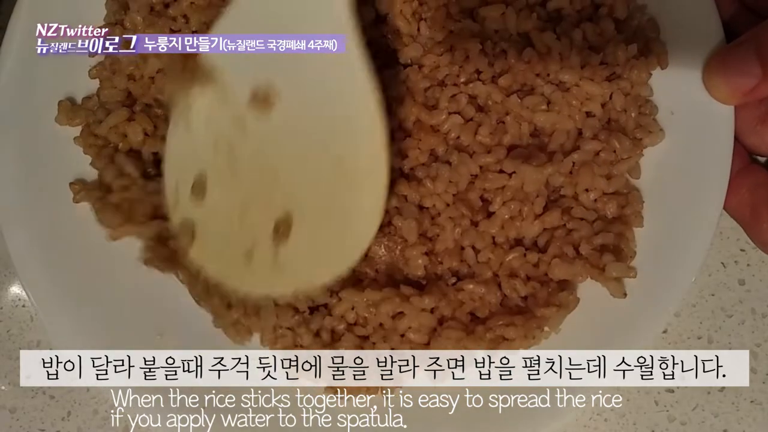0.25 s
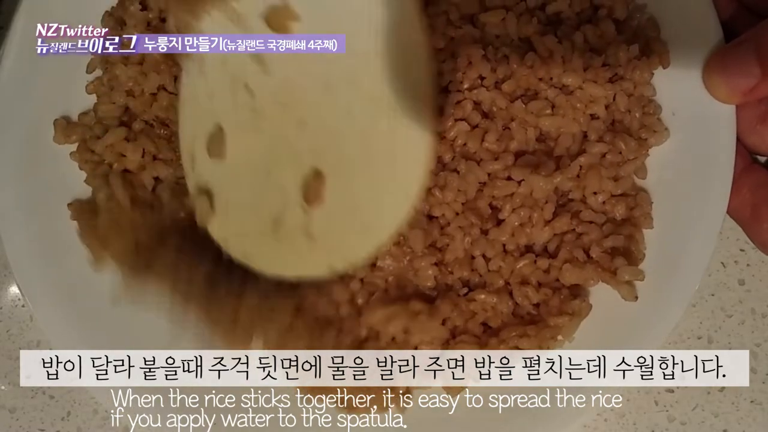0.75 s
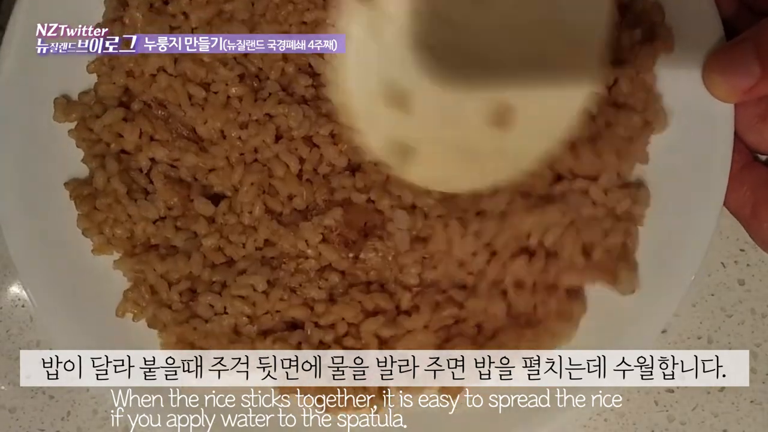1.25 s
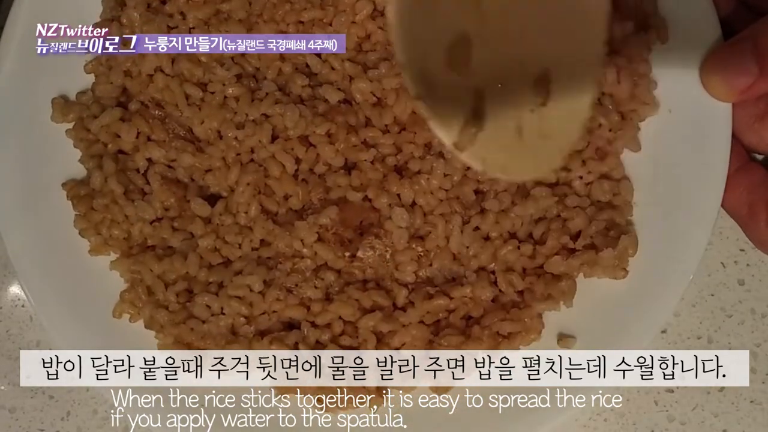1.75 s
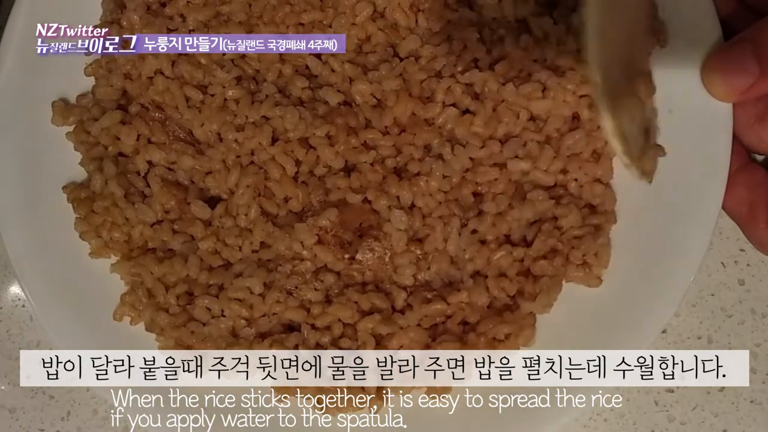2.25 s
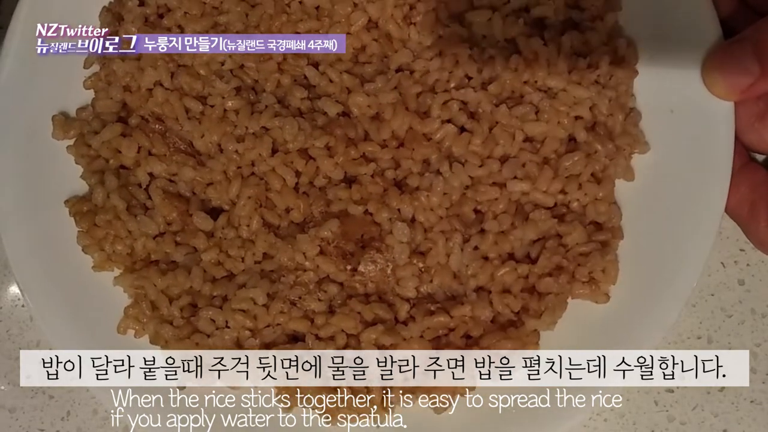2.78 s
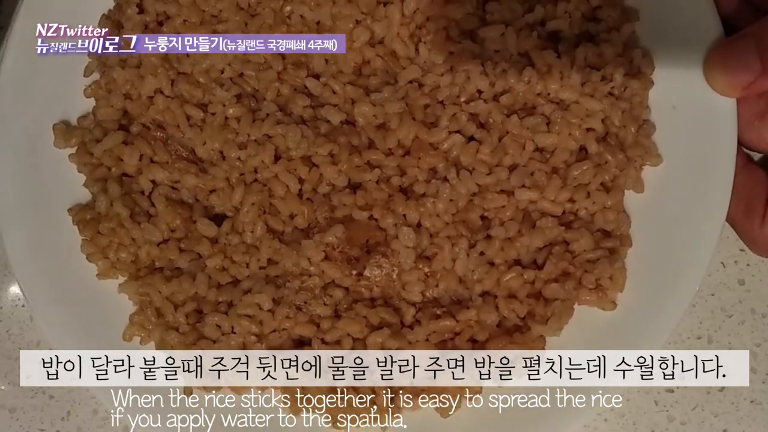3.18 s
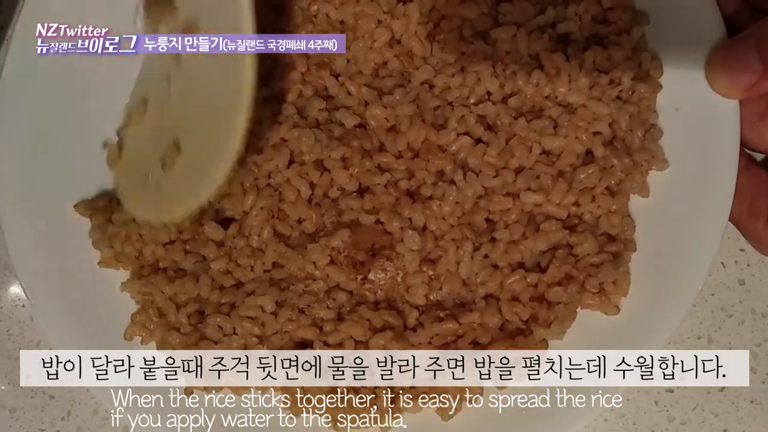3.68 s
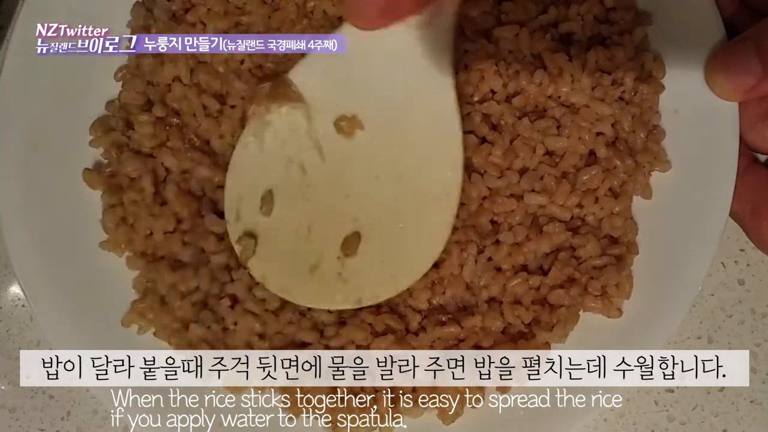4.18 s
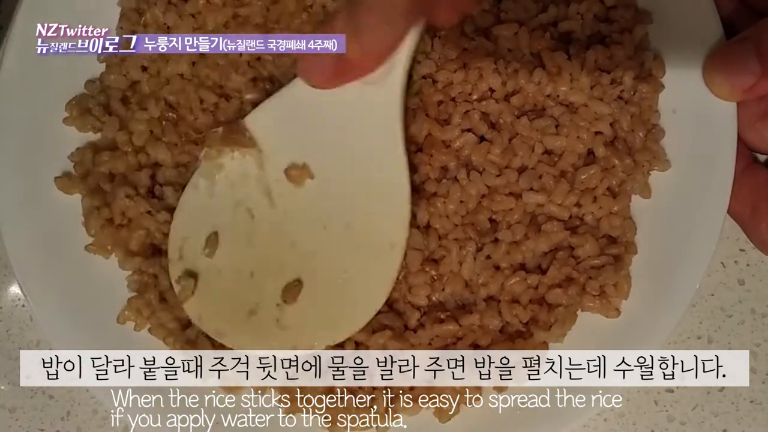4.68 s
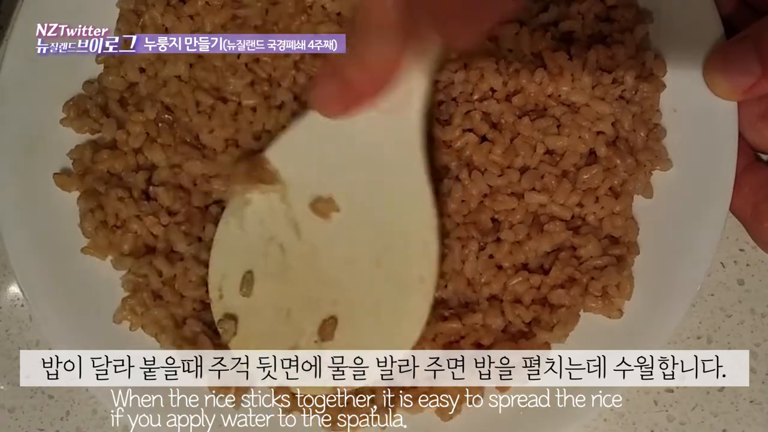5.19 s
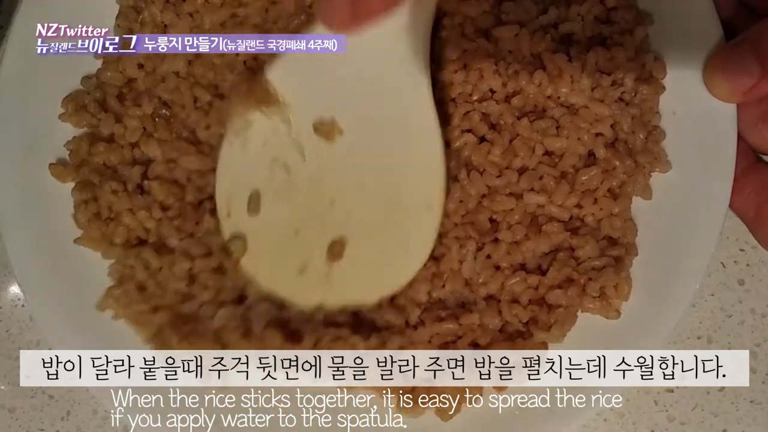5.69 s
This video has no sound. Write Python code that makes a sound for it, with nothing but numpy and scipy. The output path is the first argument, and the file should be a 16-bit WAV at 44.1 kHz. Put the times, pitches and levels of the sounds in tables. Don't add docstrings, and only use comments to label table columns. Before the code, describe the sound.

A quiet, small kitchen with hard surfaces, heard closely through a phone in stereo. From 0 to 1.8 s a plastic paddle pats and smears sticky rice on a plate: faint dry taps, dull short clunks, little tearing grain ticks and brief squelchy rubs. From about 1.87 to 2.6 s come six hard, bright knocks on the plate rim, roughly seven a second, the fourth weaker; each has a sharp clack, short ceramic ring and small-room reflection. After a half-second pause, five more knocks run from 3.08 to 3.64 s, slightly softer. A near-quiet gap follows. From about 4 s sticky smears and grain snaps return, with firmer cushioned taps around 4.46, 4.74 and 5.2 s and a busy cluster from 5.6 to 5.9 s. Low soft plate thumps accompany contacts. Steady faint hiss and a broken, low fridge hum lie beneath, with slightly smeared treble.

```python
import sys
import numpy as np
from scipy import signal
from scipy.fft import rfft, irfft
from scipy.io import wavfile
from scipy.ndimage import uniform_filter1d, map_coordinates

SR = 44100
rng = np.random.default_rng(int(sys.argv[2]) if len(sys.argv) > 2 else 0)


def volts_from_decibels(level):
    exponent = np.asarray(level, float) / 20
    return 10 ** exponent


def store_wav(level_fs):
    pcm = np.round(np.clip(np.atleast_2d(level_fs), -1, 1) * 32767)
    wavfile.write(sys.argv[1], SR, pcm.T.astype(np.int16))


N = 261954


def unit(x):
    return x / np.sqrt(np.mean(x ** 2) + 1e-20)


def wobble(rate):
    knots = rng.standard_normal(int(N * rate / SR) + 4)
    return map_coordinates(knots, [np.arange(N) * rate / SR])


def along(points, hz):
    f, v = np.transpose(points)
    return np.interp(np.log(hz + 1), np.log(f), v)


def coloured(x, spectrum):
    n = x.shape[-1]
    hz, db = np.transpose(spectrum)
    pitch = np.log(np.fft.rfftfreq(n, 1 / SR) + 1)
    gain = volts_from_decibels(np.interp(pitch, np.log(hz), db, -120, -120))
    return unit(irfft(rfft(x) * gain, n))


# (frequency [Hz], correlation [1])
NEAR = [(150, 0.63), (500, 0.45), (1200, 0.63), (2500, 0.025), (8000, 0.26)]


def pair(n, patchy_db, size, floor=-9):
    hz, _, (a, b) = signal.stft(rng.standard_normal((2, n)), SR, nperseg=512)
    turn = np.arccos(np.clip(along(NEAR, hz), -1, 1))[:, None] / 2
    field = rng.standard_normal(a.shape)
    field = uniform_filter1d(field, size[0], axis=0)
    field = unit(uniform_filter1d(field, size[1], axis=1))
    muting_db = 22 / (1 + np.exp(6 * (field - floor)))
    gain = volts_from_decibels(patchy_db * field - muting_db)
    left = np.cos(turn) * a + np.sin(turn) * b
    right = np.cos(turn) * a - np.sin(turn) * b
    return signal.istft(gain * np.array([left, right]), nperseg=512)[1][:, :n]


def gate(s, length):
    t = np.arange(N) / SR
    edge_s = .012
    return np.clip(np.minimum(t - s, s + length - t) / edge_s + .5, 0, 1)


# (start [s], length [s], level [dB])
HUM_OPEN = [(0, 0.28, -68), (.35, 0.4, -62.5), (.77, 0.1, -64.5), (1.312, 0.13, -64.5), (1.71, 0.048, -59),
            (1.886, 0.16, -61.5), (2.132, .5, -59.5), (2.69, 0.43, -68), (3.2, 0.094, -65.5),
            (3.34, 0.079, -64.5), (3.632, 0.09, -60), (3.7, 0.21, -68.5), (4.115, 0.058, -64.5),
            (4.294, 0.036, -55.5), (4.356, 0.043, -71), (4.467, 0.12, -68), (4.634, 0.12, -73),
            (5.125, 0.04, -72), (5.627, 0.08, -63), (5.75, 0.13, -58)]
# (start [s], length [s], level [dB])
OCTAVE_OPEN = [(0, 0.1, -62), (0.21, 0.11, -67), (.34, .53, -66), (0.978, .11, -67.5), (1.14, 0.035, -74),
               (1.23, 0.032, -70), (1.417, .11, -66), (1.569, .04, -69), (1.88, 0.18, -61),
               (2.13, 0.51, -59.5), (2.71, .1, -69.5), (2.908, .12, -62), (3.188, 0.34, -69),
               (3.64, 0.115, -59.5), (3.838, 0.13, -68.5), (4.46, 0.14, -71), (4.63, .1, -68.5),
               (4.89, 0.067, -68), (5.327, 0.091, -73.5), (5.75, 0.16, -64)]
# (frequency [Hz], level [dB])
FAN = [(980, -77.5), (1165, -87)]
# (frequency [Hz], level [dB per Hz])
RUMBLE = [(30, -32.5), (60, -24), (100, -0.5), (150, -3.5), (200, -5.5), (300, -6.5), (340, -42)]


def fridge():
    t = np.arange(N) / SR
    shut_hum_db = -88.5
    hum_gain = volts_from_decibels(shut_hum_db) + sum(volts_from_decibels(db) * gate(s, length) for s, length, db in HUM_OPEN)
    octave_gain = sum(volts_from_decibels(db) * gate(s, length) for s, length, db in OCTAVE_OPEN)
    phase = 2 * np.pi * 98 * t + .5 * wobble(6)
    hum = volts_from_decibels(-4.5) * hum_gain * np.sin(phase)
    octave = octave_gain * volts_from_decibels(-4 + 1.3 * wobble(26)) * np.sin(2.02 * phase + 0.9 * wobble(32))
    rumble_gain = volts_from_decibels(-9) * hum_gain + volts_from_decibels(-15.5) * octave_gain + volts_from_decibels(-92.5)
    rumble = rumble_gain * coloured(pair(N, patchy_db=6, size=(1, 5)), RUMBLE)
    lines = 0
    for hz, db in FAN:
        lines = lines + volts_from_decibels(db + 1.2 * wobble(5)) * np.sin(2 * np.pi * hz * t + 1.2 * wobble(16))
    return hum + octave + lines + rumble


# (frequency [Hz], level [dB per Hz])
AIR = [(450, -32), (760, -7), (852, -9.5), (1000, -2), (1040, -7.5), (1190, -7.5), (2810, -17),
       (5100, -18.5), (6170, -19.5), (9150, -20), (9880, -24.5), (15800, -15)]


def air():
    return volts_from_decibels(-67 + 0.63 * wobble(7.2)) * coloured(pair(N, patchy_db=3.5, size=(2, 9)), AIR[1:])


# (frequency [Hz], level [dB per Hz])
MURMUR = [(230, -28.5), (260, -9.5), (480, -1), (680, 3.5), (770, -3.5), (800, -39)]
# (start [s], length [s])
MUTES = [(0.295, .04), (0.42, 0.027), (0.73, 0.05), (1.1, 0.036), (1.52, 0.033), (1.64, 0.067),
         (1.785, 0.067), (2.797, .03), (2.86, .025), (2.94, 0.032), (3.15, .05), (3.929, 0.097),
         (4.332, 0.064), (4.59, 0.055), (4.678, 0.047), (4.822, 0.075), (4.99, .025), (5.086, 0.038),
         (5.272, 0.033), (5.427, 0.1), (5.803, 0.048)]


def murmur():
    t = np.arange(N) / SR
    murmur_db, mute_db = -75.5, -20
    puff_db, puff_t60_s = 1.3, 0.054
    hush = volts_from_decibels(murmur_db + mute_db * sum(gate(s, length) for s, length in MUTES))
    puffs = sum(volts_from_decibels(db + puff_db - 60 * np.abs(t - s) / puff_t60_s) * (t > s) for s, db, hz in CLUNKS)
    return (hush + puffs) * coloured(pair(N, patchy_db=2, size=(2, 7), floor=-0.21), MURMUR)


# (time [s], peak level [dB], frequency [Hz], t60 [s])
THUMPS = [(0.34, -59, 211, 0.032), (0.499, -57.5, 192, 0.096), (0.581, -62, 192, 0.1),
          (0.843, -68, 144, 0.095), (1.317, -59.5, 207, 0.05), (1.712, -57, 204, 0.093),
          (1.87, -38, 226, 0.022), (1.997, -47, 210, 0.058), (2.136, -53, 217, 0.049),
          (2.416, -48, 216, 0.041), (2.575, -49.5, 206, 0.061), (3.076, -53.5, 212, 0.029),
          (3.219, -51.5, 230, 0.041), (3.368, -49.5, 213, 0.037), (3.504, -58.5, 296, 0.034),
          (3.64, -47.5, 210, 0.031), (4.131, -55, 204, 0.059), (4.293, -43.5, 197, 0.036),
          (4.362, -60.5, 197, 0.043), (4.467, -63, 200, 0.066), (4.552, -65, 285, 0.067),
          (4.639, -64.5, 210, 0.079), (5.035, -71, 207, 0.063), (5.136, -52, 203, 0.03),
          (5.651, -48.5, 208, 0.053), (5.75, -42, 214, 0.034), (5.856, -47, 202, 0.05)]


def thumps():
    t = np.arange(SR // 5) / SR
    out = np.zeros(N + SR)
    for s, db, hz, t60 in THUMPS:
        push = np.sin(2 * np.pi * hz * t) * volts_from_decibels(-60 * t / max(t60, .02)) * (1 - np.exp(-t / 0.0024))
        out[round(s * SR):][:len(t)] += volts_from_decibels(db + 11.0) * push
    return out[:N] * volts_from_decibels([[-.7], [.7]])


# (time [s], peak level [dB], frequency [Hz])
CLUNKS = [(.072, -64.5, 666), (.355, -63.5, 592), (.44, -64, 716), (.56, -60, 660), (.794, -57, 626),
          (1.18, -62, 657), (1.38, -65, 480), (1.56, -67.5, 484), (1.625, -71, 620), (1.77, -67.5, 486),
          (4.05, -66.5, 643), (4.25, -63, 492), (4.465, -51.5, 608), (4.552, -52.5, 618),
          (4.67, -71.5, 665), (4.744, -48.5, 611), (4.89, -69, 495), (5.208, -57, 627), (5.34, -66.5, 672),
          (5.588, -52, 617), (5.654, -47, 497), (5.751, -50, 640), (5.856, -49, 520), (5.915, -66, 700)]


def clunks():
    t = np.arange(SR // 5) / SR
    t60_s, rise_s = 0.079, 0.0026
    out = np.zeros((2, N + SR))
    for s, db, hz in CLUNKS:
        drift = .006 * np.cumsum(rng.standard_normal(len(t))) + rng.normal(0, 0.22, (2, 1))
        envelope = volts_from_decibels(db + 7 - 60 * t / t60_s) * (1 - np.exp(-t / rise_s))
        out[:, round(s * SR):][:, :len(t)] += envelope * np.sin(2 * np.pi * hz * t + drift)
    return out[:, :N]


# (time [s], peak level [dB], frequency [Hz])
TICKS = [(0.3393, -48.5, 3620), (0.3782, -47, 2920), (0.605, -62, 3490), (0.842, -48, 3570),
         (0.8653, -46.5, 4455), (1.069, -51.5, 2457), (1.4144, -55.5, 3544), (1.559, -51, 2944),
         (1.7711, -58.5, 4310), (3.9704, -58.5, 3576), (4.0583, -56.5, 3520), (4.1282, -43.5, 4370),
         (4.2922, -54.5, 3150), (4.36, -54.5, 3580), (5.0365, -57, 3147), (5.1326, -56.5, 2670),
         (5.6195, -46.5, 3615), (5.7103, -53.5, 2247), (5.8002, -59, 3435), (5.8498, -35, 3580)]


def ticks():
    t = np.arange(SR // 20) / SR
    envelope = (1 - np.exp(-t / 0.00076)) * volts_from_decibels(-60 * t / 0.036)
    out = np.zeros((2, N + SR))
    for s, db, hz in TICKS:
        ragged = 0.29 * np.cumsum(rng.standard_normal((2, len(t))), axis=1)
        snap = np.sin(2 * np.pi * hz * t + ragged)
        out[:, round(s * SR):][:, :len(t)] += volts_from_decibels(db - 1) * snap * envelope
    return out[:, :N]


# (frequency [Hz], level [dB per Hz])
RICE = [(1530, -30), (2600, -8), (3460, -3), (3820, -5), (8570, -6), (9310, -9), (14400, -4), (15800, 0)]
# (middle time [s], level [dB], half length [s])
SMEARS = [(.36, -55, 0.0087), (0.448, -56.5, 0.023), (0.609, -62, 0.012), (0.689, -58.5, 0.031),
          (.865, -59, 0.026), (0.967, -57, 0.031), (1.255, -55.5, 0.022), (1.479, -66.5, 0.013),
          (2.399, -61, 0.0049), (3.011, -64, .02), (4.063, -64.5, 0.012), (4.149, -59.5, 0.019),
          (4.24, -54.5, 0.025), (4.383, -60.5, 0.015), (4.474, -53, 0.028), (4.557, -56, 0.012),
          (4.655, -67, 0.013), (4.747, -49.5, 0.018), (4.994, -54.5, 0.023), (5.142, -64, 0.014),
          (5.225, -59.5, 0.03), (5.592, -58.5, 0.025), (5.623, -64, 0.013), (5.709, -52.5, 0.02),
          (5.754, -53, 0.0095), (5.811, -56, 0.025), (5.914, -55, 0.02)]


def smears():
    t = np.arange(N) / SR
    pressure = sum(volts_from_decibels(db) * np.exp(-((t - s) / half) ** 2) for s, db, half in SMEARS)
    grains = pair(N, patchy_db=1.5, size=(6, 5)) * volts_from_decibels(1.1 * wobble(350))
    return pressure * coloured(grains, RICE)


def ring(modes, t, rise, blur):
    hz, db, t60 = np.transpose(modes)[:, :, None]
    drift = blur * np.cumsum(rng.standard_normal((len(modes), len(t))), axis=1)
    start = rng.uniform(0, 2 * np.pi, (len(modes), 1))
    start = start + rng.normal(0, 0.6, (2, len(modes), 1)) * np.sqrt(hz / 1000)
    size = volts_from_decibels(db + rng.normal(0, 2.5, db.shape) - 60 * t / t60)
    return (1 - np.exp(-t / rise)) * np.sum(size * np.sin(2 * np.pi * hz * t + start + drift), axis=1)


def dulled(x, dry_db):
    n = x.shape[-1]
    dull_hz, dulling, dull_s = 3234, 0.45, 0.0059
    treble = irfft(rfft(x) / (1 + (dull_hz / (np.fft.rfftfreq(n, 1 / SR) + 1)) ** 8), n)
    sunk_db = -dulling * max(dry_db, 0) * (1 - np.exp(-np.arange(n) / SR / dull_s))
    return x - treble * (1 - volts_from_decibels(sunk_db))


FAMILIES_HZ = [300, 560, 1100, 1650, 2250, 3150, 4200, 6000]


def spotted(x, spot_db):
    body, *rest = spot_db
    n = x.shape[-1]
    families = np.c_[FAMILIES_HZ, [0, body, 0, *rest, 0]]
    return irfft(rfft(x) * volts_from_decibels(along(families, np.fft.rfftfreq(n, 1 / SR))), n)


# (frequency [Hz], level [dB per Hz])
ANSWER = [(260, -40), (450, -8.5), (947, -13), (1400, -10), (1580, -5), (1850, -4.5), (1990, -2),
          (2330, -4.5), (4300, -2), (8300, -10), (10800, -40), (18300, -120)]


def crack_and_room(t, crack_hz, near_db, dry_db, decay, streaks_db):
    between_ports = 0.9 * np.c_[[1, -1]]
    swell = np.exp(-(t * crack_hz / 0.74 - 2) ** 2)
    crack = swell * np.cos(2 * np.pi * crack_hz * t - 7.5 + between_ports)
    walls = np.zeros((2, len(t)))
    walls[:, 0] = .9
    when = rng.uniform(0.0082, 0.02, (7, 2))
    echoes = volts_from_decibels(near_db + 2 - 60 * when / 0.13) * rng.standard_normal((7, 2))
    walls[[0, 1], (when * SR).astype(int)] = echoes
    hit = signal.fftconvolve(walls, crack[:, :200], axes=1)[:, :len(t)]
    wash = dulled(coloured(pair(len(t), streaks_db, size=(2, 14)), ANSWER[1:]), dry_db)
    return hit + volts_from_decibels(3.5) * decay * (1 - np.exp(-t / 0.00091)) * wash


# (frequency [Hz], level [dB], t60 [s])
PLATE = [(847, -14, .17), (1070, -16, .14), (1235, -13, .16), (1540, -7, .2), (1578, -2, .22),
         (1667, -1, .24), (1714, -4, .2), (1921, -5, .16), (1990, -8, .14), (2040, -7, .15),
         (2103, -8, .14), (2490, -9, .13), (2620, -9, .13)]
# (frequency [Hz], level [dB], t60 [s])
RIM = [(3030, -6, .14), (3165, -6, .14), (3225, -7, .14), (3378, -6, .14), (3860, -8, .13), (3930, -9, .1),
       (4075, -7, .1), (4155, -6, .14), (4220, -3, .16), (4310, -6, .14), (4376, -7, .14), (4440, -8, .13)]
# (frequency [Hz], level [dB], t60 [s])
BODY = [(342, -6, .12), (488, 0, .13), (611, -4, .11), (670, -5, .11)]


def plate_and_body(t, plate_db, body_db, low_db, dry_db):
    modes = volts_from_decibels(plate_db - 3) * dulled(ring(PLATE + RIM, t, rise=.004, blur=.022), dry_db)
    modes += volts_from_decibels(plate_db + low_db) * ring(PLATE[:1], t, rise=.004, blur=.01)
    modes += volts_from_decibels(body_db + 1.5) * ring(BODY, t, rise=.003, blur=0.0085)
    return volts_from_decibels(-14 * max(dry_db, 0) * t) * modes


# (frequency [Hz], level [dB per Hz])
TOP = [(4710, -30.5), (8000, -6.5), (9650, 0), (11000, -6), (11900, 1.5), (12900, -1.5), (15800, -2)]


def top_octave(t, lead, decay, far_t60, streaks_db):
    top_fades = 1.15
    after = .5 * (decay / decay[0]) ** top_fades + .5 * volts_from_decibels(-60 * t / 0.0067) + .04 * volts_from_decibels(-60 * t / far_t60)
    after = np.roll(after, round(lead * SR))
    step = np.where(t < lead, volts_from_decibels(-12 * (1.5 - t / lead)), after)
    noise = coloured(pair(len(t), streaks_db, size=(2, 30)), TOP[1:])
    return np.clip(t / .001, 0, 1) * step * noise * volts_from_decibels([[-1], [1]])


def strikes(rows, lead, late, near_t60, far_t60, streaks_db):
    size = SR // 3
    margin = 200
    spot_in_wash = .6
    t = np.arange(size) / SR
    out = np.zeros((2, N + size))
    for s, db, near_db, far_db, top_db, plate_db, body_db, pan_db, crack_hz, low_db, *spot_db in rows:
        db = db + pan_db * np.c_[[.5, -.5]]
        dry_db = near_db - far_db
        decay = volts_from_decibels(near_db - 60 * t / near_t60) + volts_from_decibels(far_db - 60 * t / far_t60)
        hit = crack_and_room(t, crack_hz, near_db, dry_db, decay, streaks_db)
        hit = spotted(np.roll(hit, shift=margin, axis=1), spot_in_wash * np.array(spot_db))
        modes = plate_and_body(t, plate_db, body_db, low_db, dry_db)
        hit = hit + spotted(np.roll(modes, shift=margin, axis=1), spot_db)
        hit = np.roll(hit, shift=-margin, axis=1)
        hit[:, -margin:] = 0
        at = round((s + late) * SR)
        out[:, at:at + size] += volts_from_decibels(db) * hit
        fizz = top_octave(t, lead, decay, far_t60, streaks_db)
        out[:, at - round(lead * SR):][:, :size] += volts_from_decibels(db + top_db + 7) * fizz
    return out[:, :N]


# (time [s], crack peak [dB], near scatter [dB], room tail [dB], top octave [dB])
TAPS = [(0.0712, -36.5, -12, -47, -36.5), (0.3551, -44, -2, -22, -8), (0.4354, -54.5, -5.5, -13, -5.5),
        (0.5023, -50, -3.5, -17, -13), (0.6699, -38.5, -10, -22, -23.5), (0.7936, -33, -11, -34, -25.5),
        (1.3129, -39.5, -14, -38, -25), (1.6252, -46.5, -9.5, -36, -40), (1.7389, -52.5, -3.5, -53, -18),
        (4.4648, -24, -12.5, -28, -32), (4.5516, -44.5, -1.5, -27, -15), (4.7441, -20, -17, -26.5, -21.5),
        (5.2076, -30, -13, -50, -32), (5.5882, -31, -13.5, -28, -26.5), (5.6521, -55, 2.5, -10, -3.5),
        (5.6895, -25.5, -16.5, -30.5, -26.5), (5.7473, -43.5, -6.5, -37, -22),
        (5.8516, -38, -32, -31, -14.5)]


def taps():
    s, db, near_db, far_db, top_db = np.transpose(TAPS)
    plate_db, body_db = near_db - 11.5, near_db - 26.5
    pan_db, crack_hz = 0 * s, 0 * s + 3010
    chance = rng.normal(0, 3, (len(s), 6))
    rows = np.c_[s, db, near_db, far_db, top_db, plate_db, body_db, pan_db, crack_hz, chance]
    return strikes(rows, lead=0.0011, late=0.0012, near_t60=0.026, far_t60=0.12, streaks_db=2.5)


# (time [s], crack peak [dB], near scatter [dB], room tail [dB], plate ring [dB])
KNOCKS = [(1.8673, -8.5, -13.5, -27, -19), (1.9967, -8, -13.5, -24.5, -18), (2.137, -9, -15.5, -17.5, -14),
          (2.2853, -22.5, -5, -29, -9.5), (2.4177, -8.5, -16.5, -20.5, -14.5),
          (2.573, -10, -12, -19.5, -19.5), (3.0802, -9.5, -16, -30, -30.5), (3.2201, -17.5, -7, -7, -27.5),
          (3.3666, -18, -5.5, -9, -16.5), (3.5089, -12.5, -13.5, -31.5, -19),
          (3.6394, -13.5, -9.5, -21, -15.5)]
# (left over right [dB], crack frequency [Hz], top octave [dB], 850 Hz ring [dB])
ANGLES = [(-2, 3800, .1, -3), (-.4, 3300, .1, -3), (-1.2, 3900, .1, -3), (-4.4, 3800, .1, -3),
          (-.3, 3800, .1, .1), (-.4, 3800, .1, -3), (-2.1, 3800, .1, -3), (-1.1, 3800, .1, 6),
          (-1.3, 3300, .1, 6), (-3.6, 3600, .1, -3), (-1.1, 3500, .1, -5)]
# (body [dB], low ring [dB], middle [dB], rim [dB], high rim [dB])
SPOTS = [(-8, 3, .1, .1, 2), (2, 3, -2, 3, .1), (-1, 4, -3, .1, 3), (6, 3, .1, .1, .1), (-8, .1, 2, 3, 2),
         (-2, .1, .1, .1, 3), (-3, 2, 2, -1, 1), (-1, 2, -3, -1, 1), (-3, .1, 2, .1, .1),
         (-2, -3, -2, 4, 2), (4, 4, -2, 3, .1)]


def knocks():
    s, db, near_db, far_db, plate_db = np.transpose(KNOCKS)
    pan_db, crack_hz, extra_db, low_db = np.transpose(ANGLES)
    top_db = near_db + 0.96 + 0.38 * (far_db - near_db) + extra_db
    body_db = plate_db - 13
    rows = np.c_[s, db, near_db, far_db, top_db, plate_db, body_db, pan_db, crack_hz, low_db, SPOTS]
    return strikes(rows, lead=.006, late=.0016, near_t60=0.047, far_t60=0.23, streaks_db=2.0)


def scene():
    left, right = fridge() + air() + murmur() + clunks() + ticks() + smears() + taps()
    aside = volts_from_decibels([[-1.5], [1.5]]) * np.array([np.roll(left, shift=4), right])
    return aside + thumps() + knocks()


# (frequency [Hz], threshold [spreads])
HOLES = [(300, -3), (2500, -2.5), (5000, -1.9), (9000, -1.4), (11000, -1.15), (13000, -1.3), (15500, -1.7)]


def dropouts(x):
    hz, _, z = signal.stft(x, SR, nperseg=512)
    bins, frames = z.shape[1:]
    blocks = rng.standard_normal((bins // 4 + 1, frames // 4 + 1))
    blocks = unit(uniform_filter1d(blocks, size=4, axis=1))
    field = np.kron(blocks, np.ones((4, 4)))[:bins, :frames]
    power = np.sum(np.abs(z) ** 2, axis=(0, 1))
    before = np.roll(uniform_filter1d(power, size=5), shift=3)
    fading = power < .1 * np.roll(uniform_filter1d(power, size=16), shift=8)
    threshold = along(HOLES, hz)[:, None] + .5 * fading * (hz > 4500)[:, None]
    empty = (power < 2 * before) * (field < threshold)
    return signal.istft(z * np.where(empty, volts_from_decibels(-26), 1), nperseg=512)[1][:, :N]


def roll_off(x):
    return signal.sosfilt(signal.butter(12, 16970, fs=SR, output="sos"), x)


def record(dry):
    mix = dropouts(dry)
    return roll_off(mix)


dry = scene()
out = record(dry)
store_wav(out)
```